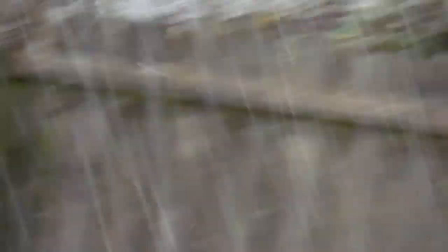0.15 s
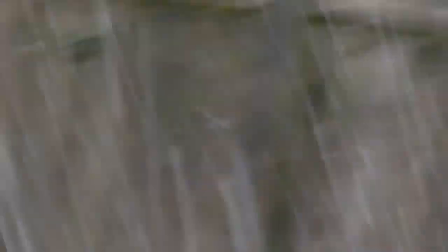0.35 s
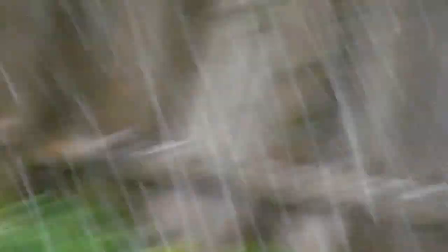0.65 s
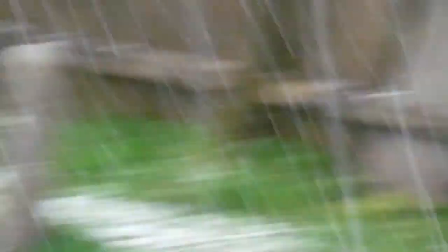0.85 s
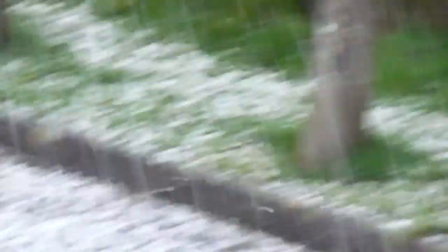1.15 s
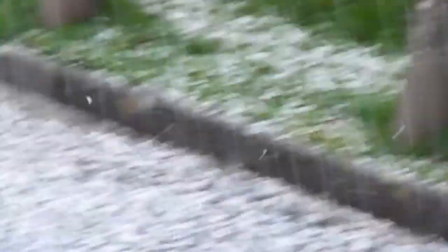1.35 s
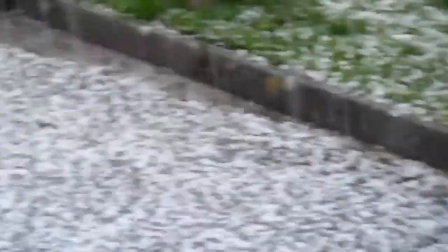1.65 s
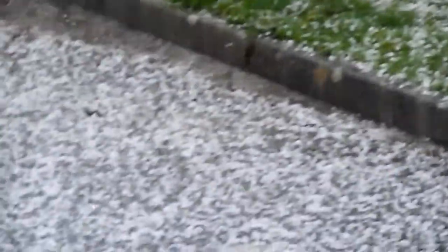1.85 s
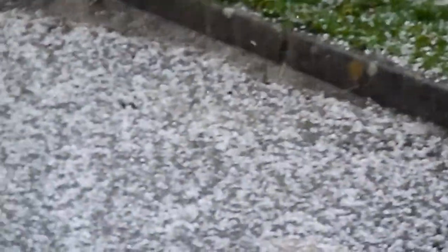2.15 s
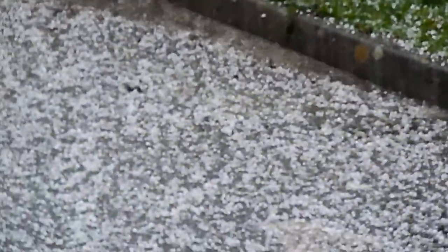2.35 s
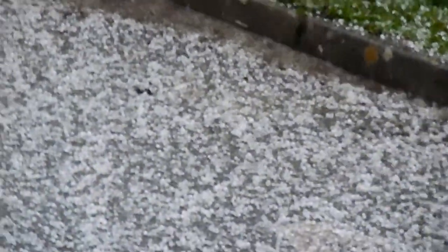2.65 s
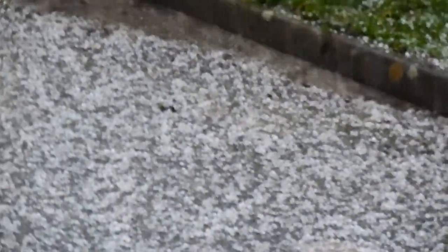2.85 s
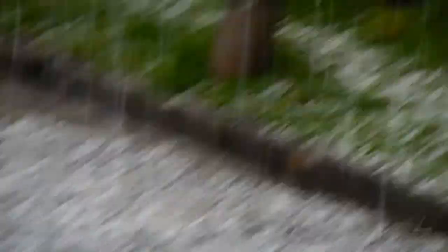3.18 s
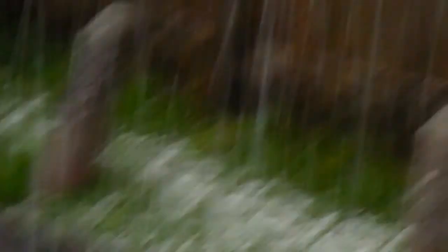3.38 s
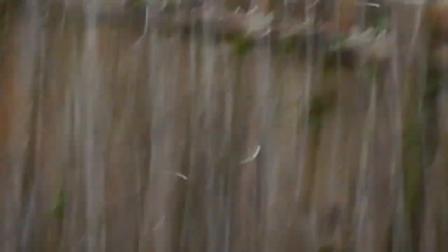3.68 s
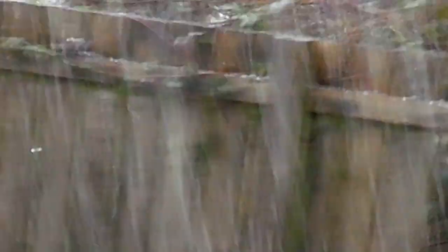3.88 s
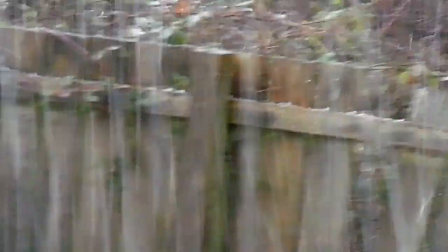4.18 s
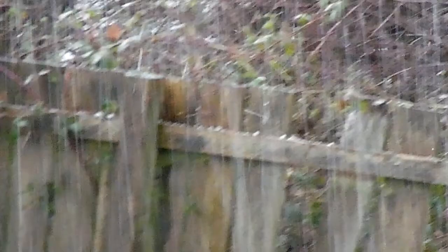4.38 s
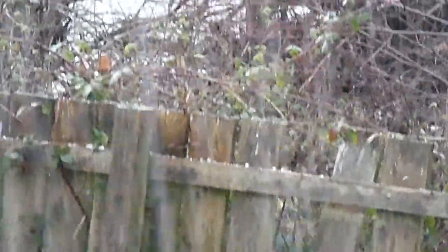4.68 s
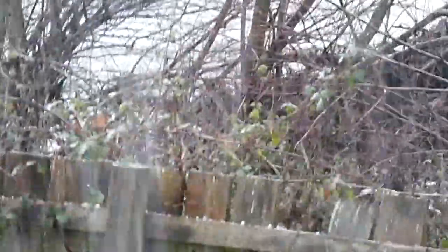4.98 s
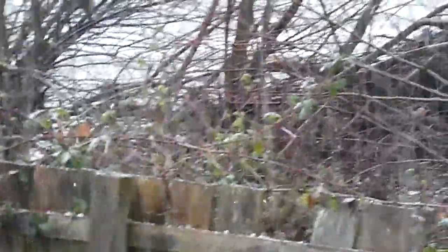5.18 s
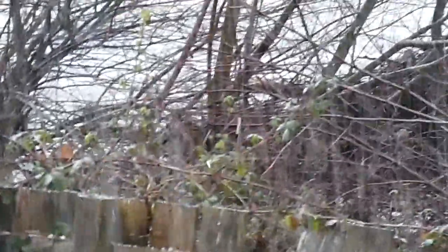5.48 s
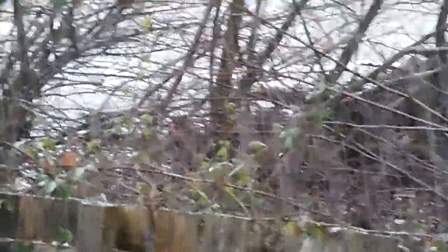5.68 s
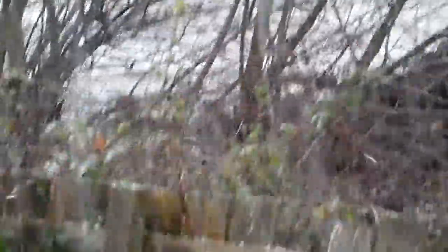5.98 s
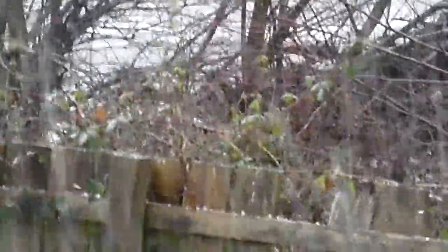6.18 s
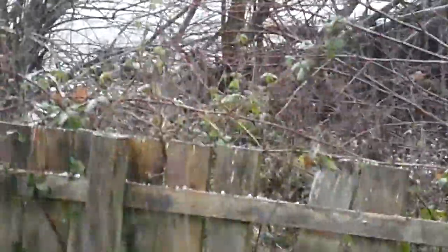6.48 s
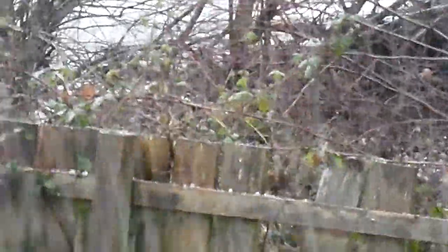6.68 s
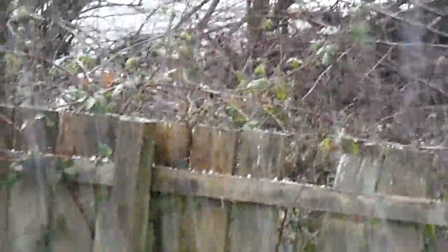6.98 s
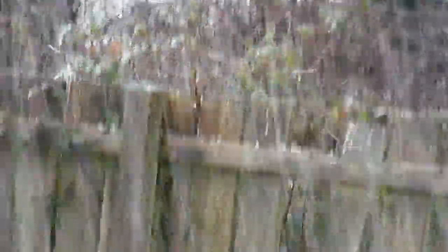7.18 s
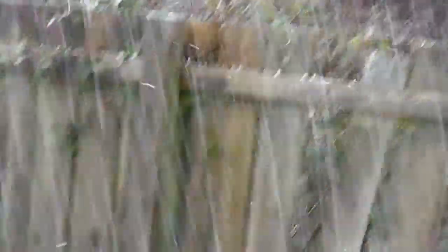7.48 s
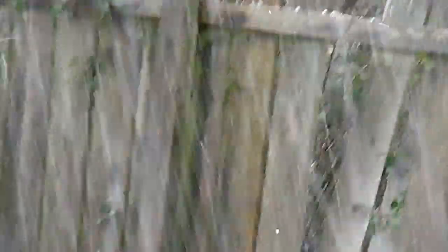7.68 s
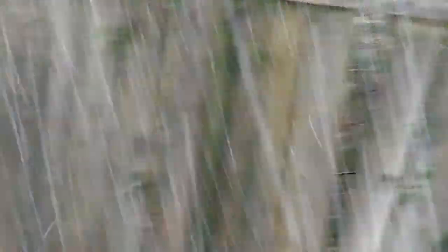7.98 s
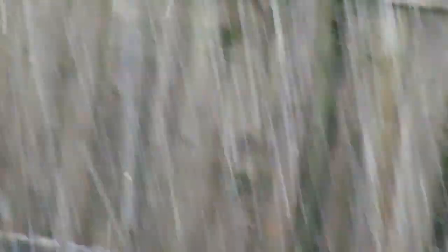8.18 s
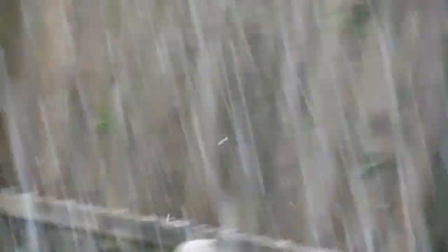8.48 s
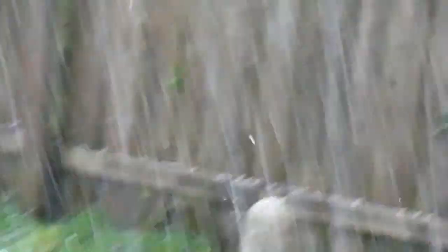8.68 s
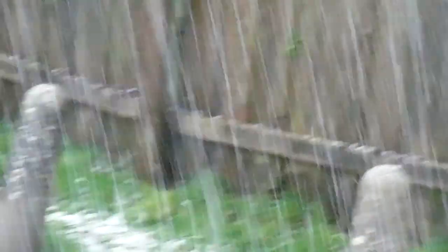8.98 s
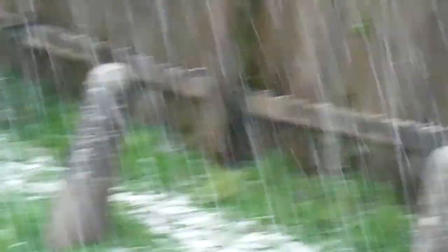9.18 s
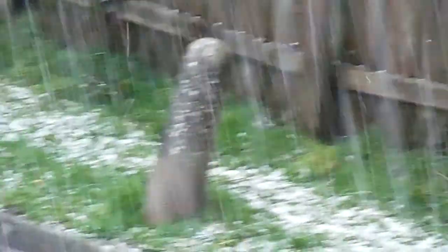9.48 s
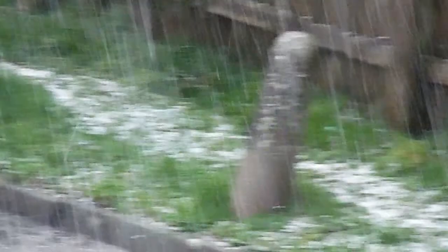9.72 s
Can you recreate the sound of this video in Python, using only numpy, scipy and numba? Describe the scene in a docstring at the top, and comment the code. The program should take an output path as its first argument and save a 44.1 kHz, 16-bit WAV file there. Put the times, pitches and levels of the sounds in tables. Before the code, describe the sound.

Hail falls outdoors for about ten seconds, heard from beside a house wall. A dense, bright hiss of stones on paving runs throughout, with a duller patter on wood and a low rumble underneath. Close stones click and shatter sharply on the ground, in a flurry from 0.4 to 0.7 seconds, where one knocks on a wooden fence. Strong snaps come around 1.3, 2.3, 3.3, 4.1 and 4.4 seconds. Faint metallic pings are scattered between 1.4 and 6.3 seconds, and light taps on twigs come now and then. At about 5.2 seconds a big stone cracks on a very near ledge and bounces. A dull wooden knock and a sharp click land at 7 seconds. From 8.6 to 9.7 seconds several stones knock on the boards among more clicks. The hiss dips briefly after the hardest blows, then creeps back.

```python
"""Beside a house wall, in a hailstorm on paving, grass and a wooden fence.
Over a low rumble, countless far impacts superpose into a hiss, while nearer ones tick and patter.
A few stones strike close by: they crack on stone or excite the damped modes of twigs, metal, boards
and a ledge, and the wall reflects these blows. The fall is nearly steady, but each hard blow makes
the recorder's gain control duck, hold and creep back."""
import sys
import numpy as np
from scipy import signal
from scipy.fft import rfft, irfft
from scipy.io import wavfile
from scipy.ndimage import minimum_filter1d
from numba import njit

SR = 44100
rng = np.random.default_rng(int(sys.argv[2]) if len(sys.argv) > 2 else 0)


def store_wav(level_fs):
    """Save 16-bit WAV to argv[1]."""
    pcm = np.round(np.clip(np.atleast_2d(level_fs), -1, 1) * 32767)
    wavfile.write(sys.argv[1], SR, pcm.T.astype(np.int16))


N = 434385
TIME = np.arange(N) / SR
AGE = TIME[:SR // 3]  # seconds since an impact


def undb(db):
    """Decibels to amplitude ratio."""
    return 10 ** (np.asarray(db) / 20)


def unit(x):
    """Normalisation to rms 1."""
    return x / np.sqrt(np.mean(x ** 2))


def curves(rows):
    """Linear interpolation of each column over time."""
    s, *columns = np.transpose(rows)
    return [np.interp(TIME, s, c) for c in columns]


def colour(x, spectrum):
    """Minimum-phase filtering to a given spectrum, with unit power gain."""
    size = 4096
    hz, db = np.transpose(spectrum)
    gain = undb(np.interp(np.log(np.fft.rfftfreq(size, 1 / SR) + 1), np.log(hz), db))
    cepstrum = irfft(np.log(gain))
    cepstrum[1:size // 2] *= 2
    cepstrum[size // 2 + 1:] = 0
    response = irfft(np.exp(rfft(cepstrum)))
    return signal.fftconvolve(x, response / np.linalg.norm(response))[:len(x)]


def bandpass(x, order, low_hz, high_hz):
    """Butterworth band-pass filtering."""
    return signal.lfilter(*signal.butter(order, [low_hz, high_hz], "bandpass", fs=SR), x)


def ring(hz, t60):
    """Free vibration of a damped mode, falling 60 dB in t60 seconds."""
    return np.sin(2 * np.pi * hz * AGE) * np.exp(-np.log(1000) * AGE / t60)


def burst(t60):
    """White noise in exponential decay."""
    return rng.standard_normal(len(AGE)) * np.exp(-np.log(1000) * AGE / t60)


def add(out, s, sound):
    """Superposition of a sound starting at s seconds."""
    i = int(s * SR)
    out[i:i + len(sound)] += sound[:N - i]


def walk(per_s):
    """Interpolated noise: a slow wandering with a spread near 1."""
    step = int(SR / per_s)
    count = N // step + 2
    return np.interp(TIME, np.arange(count) * step / SR, rng.standard_normal(count))


def impacts(per_s, spread_db):
    """A Poisson process of impacts: many small, a few large."""
    falls = rng.random(N) < per_s / SR
    size = undb(spread_db * np.minimum(rng.standard_exponential(N), 5))
    return unit(falls * size * rng.choice([-1, 1], N))


def scatter(x, t60, tail_db):
    """Scattering: fragments and reflections trail each impact, decaying alike in all bands."""
    power = signal.fftconvolve(x ** 2, np.exp(-2 * np.log(1000) * AGE / t60))[:N]
    tail = unit(np.sqrt(np.abs(power)) * rng.standard_normal(N))
    return unit(x + undb(tail_db) * tail)


# The rumble's spectrum. Each row: frequency in Hz, spectral density in dB.
RUMBLE_SPECTRUM = [(15, -15), (30, 1), (45, 2), (75, -3), (130, -3), (200, -3.5), (300, -7.5), (700, -24)]
# The rumble's strength. Each row: time in seconds, level in dB.
RUMBLE_LEVELS = [(0, -39.5), (1.3, -41), (2, -37), (3.5, -37.5), (4.5, -39), (6, -38.5), (7.5, -40.5),
                 (8.2, -39), (8.75, -38), (9.3, -38.5), (9.85, -37)]


def rumble():
    """Low outdoor noise, with a drone that wavers by random frequency and amplitude modulation."""
    level_db, = curves(RUMBLE_LEVELS)
    drone_hz = 58 + 4 * walk(per_s=14)
    drone = np.sin(2 * np.pi * np.cumsum(drone_hz) / SR) * (1 + .44 * walk(per_s=15))
    noise = colour(rng.standard_normal(N), RUMBLE_SPECTRUM)
    return undb(level_db) * (unit(noise) + undb(-9.5) * unit(drone))


# Hail on paving. Each row: frequency in Hz, spectral density in dB.
HISS_SPECTRUM = [(300, -12.5), (1000, -2.5), (1900, -1.5), (2600, 1), (3600, 0), (5000, 0), (7000, 0.2),
                 (9500, -1.5), (12000, -6), (15800, -12)]


def paving():
    """Shot noise: far stones merge into a wash; nearer ones tick, each size in its own band."""
    wash = impacts(per_s=9000, spread_db=2)
    near = scatter(impacts(per_s=80, spread_db=2.6), t60=.08, tail_db=7)
    chips = 0
    for hz in np.geomspace(2000, 13000, num=7):
        stones = scatter(impacts(per_s=70, spread_db=2.8), t60=.05, tail_db=5)
        chips += bandpass(stones, 1, hz / 2 ** .25, hz * 2 ** .25)
    hail = wash + undb(-6) * near + undb(-5) * unit(chips)
    return unit(colour(hail, HISS_SPECTRUM))


# Hail on wood and roofs. Each row: frequency in Hz, spectral density in dB.
PATTER_SPECTRUM = [(110, -20.5), (210, -2.5), (275, -6.5), (375, -3), (435, -5), (585, 0), (750, -3.5),
                   (900, -1), (1040, 0.5), (1380, -3), (1800, -7), (2600, -10.5), (5000, -30)]


def fence():
    """Filtered shot noise: stones drum on wood and roofs further off in a dull, dense patter."""
    blows = scatter(impacts(per_s=1500, spread_db=2), t60=.06, tail_db=2)
    flicker_db = .4 * walk(per_s=12)
    return unit(colour(blows * undb(flicker_db), PATTER_SPECTRUM))


# The modes of a piece of metal. Each row: frequency in Hz, level in dB, t60 in seconds.
METAL_MODES = [(3850, -11, .12), (4398, -4, .18), (4544, 0, .21), (4696, 0, .23), (4830, -9, .14),
               (5233, -7, .19), (6040, -7, .19)]


def tinkle():
    """Convolution of small impacts with the metal's impulse response keeps it ringing."""
    response = sum(undb(db) * ring(hz, t60) for hz, db, t60 in METAL_MODES)
    return unit(signal.fftconvolve(impacts(per_s=25, spread_db=2), response)[:N])


# The fall's strength. Each row: time in seconds, hiss level in dB, patter in dB relative to the hiss.
FALL_LEVELS = [(0, -27.4, -3.5), (.6, -26.5, -4.5), (1.45, -26.5, -3.5), (1.8, -24.5, -4),
               (2.2, -25.5, -4.5), (2.7, -25, -4), (3.2, -25.5, -5), (3.6, -27, -3.5), (4.2, -26.5, -3),
               (4.8, -24.5, -3.5), (6.1, -26, -4), (6.68, -23, -4.5), (6.95, -26, -1.5), (7.5, -26.5, -5.5),
               (8.15, -24, -4), (8.9, -25, -4), (9.4, -23.5, -5.5), (9.85, -25, -4)]


def hailfall():
    """Incoherent summation: hiss, patter and faint tinkle swell together with the fall."""
    hiss_db, patter_db = curves(FALL_LEVELS)
    return undb(hiss_db) * (paving() + undb(patter_db) * fence() + undb(-22.5) * tinkle())


# Light stones on twigs and leaves. Each row: start in seconds, level in dB, pitch in Hz.
TWIG_TAPS = [(1.048, -18, 2440), (1.226, -14, 2340), (3.273, -21, 2420), (6.169, -22, 1110),
             (7.715, -15.5, 2430), (8.239, -16, 1350), (8.572, -15, 1730), (8.955, -17, 2430)]


def taps():
    """Heavy damping: a struck twig or leaf rings for only an instant."""
    out = np.zeros(N)
    for s, db, hz in TWIG_TAPS:
        add(out, s, undb(db) * (ring(hz, t60=.019) + undb(-12) * burst(t60=.0057)))
    return out


# Breaking ice. Each row: frequency in Hz, spectral density in dB.
CRACK_SPECTRUM = [(200, -17), (1000, -13), (2500, -3), (4500, 2.5), (8000, 1), (11000, -2), (16000, -17)]


def crack(t60):
    """Brittle fracture: a breaking hailstone gives a bright burst of noise."""
    return colour(burst(t60), CRACK_SPECTRUM)


def modal_ring(modes, detune):
    """Modal superposition, with alternating signs and slightly different tuning at each blow."""
    stretch = 1 + detune * rng.standard_normal(len(modes))
    return sum((-1) ** k * undb(db) * ring(hz * stretch[k], t60)
               for k, (hz, db, t60) in enumerate(modes))


def strikes(events, modes, detune, crack_db, crack_t60):
    """Impulsive excitation: each blow rings an object's modes as the stone cracks."""
    out = np.zeros(N)
    for s, db in events:
        add(out, s, undb(db) * (modal_ring(modes, detune) + undb(crack_db) * crack(crack_t60)))
    return out


# Stones on the metal. Each row: start in seconds, level in dB.
METAL_PINGS = [(1.405, -33), (2.652, -27), (2.737, -27), (3.276, -28.5), (3.873, -30), (4.509, -25),
               (4.995, -31), (5.055, -32), (5.28, -30), (5.44, -31), (5.69, -31), (6.331, -31)]


def pings():
    """Light damping: the metal's high modes ring on past the crack."""
    return strikes(METAL_PINGS, METAL_MODES, detune=.001, crack_db=-2, crack_t60=.1)


# Close stones on hard ground; the row at 0.677 s is the wall's echo of the tick just before it. Each row: start
# in seconds, snap in dB, shatter in dB, pitch in Hz.
GROUND_TICKS = [(.413, -9, -11.5, 5100), (.511, -3, -18, 6600), (.638, -8, -11.5, 3000),
                (0.67, -9, -13, 7950), (.677, -4, -20, 8000), (.737, -4, -9.5, 4460),
                (1.313, -1, -16, 6900), (1.406, -11, -9.5, 4370), (1.674, -19, -12, 5000),
                (1.902, -4, -12.5, 8500), (2.2305, 4.5, -19, 6540), (2.2715, 5.5, -18, 9000),
                (2.315, 0, -19, 9000), (3.229, -7, -11, 5000), (3.276, 1.5, -10, 4740),
                (3.873, -11, -13, 5000), (4.119, -0.5, -17, 6040), (4.446, 2.5, -19, 5800),
                (4.797, -10, -13, 9000), (4.996, -9, -10, 5740), (6.331, -11, -11.5, 5200),
                (6.705, -2, -14, 9100), (7.037, 1, -6, 7700), (7.532, -7, -10, 7500),
                (8.114, -13, -13, 6000), (8.401, -13, -12, 6000), (8.968, 3, -22, 4050),
                (9.497, -7, -8, 4700), (9.725, -10, -7.5, 8100)]


def ticks():
    """Brief, stiff contact: ice on stone snaps for about a cycle, then shatters around that pitch."""
    out = np.zeros(N)
    rise_s = .001
    for s, snap_db, shatter_db, hz in GROUND_TICKS:
        snap = ring(hz, t60=5 / hz)
        fragments = (burst(t60=.042) + undb(-6.5) * burst(t60=.16)) * (1 - np.exp(-AGE / rise_s))
        spray = bandpass(fragments, 1, hz / 1.7, min(hz * 1.52, .45 * SR))
        add(out, s, undb(snap_db) * snap + undb(shatter_db) * spray)
    return signal.sosfilt(signal.butter(2, 1500, "highpass", fs=SR, output="sos"), out)


# A board's modes. Each row: frequency in Hz, level in dB, t60 in seconds.
BOARD_MODES = [(245, -14, 0.13), (374, -8.5, 0.083), (545, -22, .054), (670, -23, .06), (756, -10, 0.074),
               (871, -11, 0.099), (1110, -30, .05), (1224, -4.5, 0.036), (1457, -13, 0.057),
               (1614, -6.5, .073), (2035, -13, 0.056), (2850, -11, 0.076), (3130, -13, 0.055),
               (3420, -8.5, 0.036), (4290, -6.5, .035), (4580, -5.5, 0.068)]
# Stones on boards. Each row: start in seconds, level in dB, pitch of the struck spot in Hz,
# contact cut-off in Hz, board level in dB relative to the spot.
BOARD_KNOCKS = [(0.6896, -3, 1330, 2980, -8.5), (7.0624, -6.5, 400, 1000, -8), (7.378, -18, 355, 600, -1),
                (8.625, -9.5, 1757, 3500, -6), (8.9668, -6.5, 1370, 4350, -3.5),
                (9.12, -6.5, 1560, 3370, -1), (9.127, -6.5, 336, 2960, -2), (9.365, -14.5, 1820, 3070, -5),
                (9.74, -12.5, 1180, 3000, -2)]


def knocks():
    """Contact as a low-pass filter: the struck spot rings over board modes, duller for a soft blow."""
    out = np.zeros(N)
    for s, db, spot_hz, contact_hz, board_db in BOARD_KNOCKS:
        excited = [(hz, mode_db - 10 * np.log10(1 + (hz / contact_hz) ** 4), t60)
                   for hz, mode_db, t60 in BOARD_MODES]
        board = modal_ring(excited, detune=.014)
        rattle = bandpass(burst(t60=.18), 2, 300, max(contact_hz, 500))
        splinter_db = -18.5 + 5 * np.log2(contact_hz / 3000)  # harder contacts splinter more
        splinters = undb(splinter_db) * crack(t60=.091)
        spot = ring(spot_hz, t60=.027)
        add(out, s, undb(db) * (spot + undb(board_db) * (board + rattle) + splinters))
    # a narrow board radiates little bass
    return signal.sosfilt(signal.butter(4, 190, "highpass", fs=SR, output="sos"), out)


# A hard ledge's modes. Each row: frequency in Hz, level in dB, t60 in seconds.
LEDGE_MODES = [(238, -19, 0.1), (379, -5, .081), (452, -3, 0.089), (564, -4, 0.075), (715, .5, 0.03),
               (1380, -7, .024), (1770, -5, 0.02), (2180, -2, 0.05), (3260, -10, 0.046), (3536, -5, 0.04),
               (4320, -19, 0.15), (4800, -20, .07), (6030, -10, .077), (6490, -18, .056), (7190, -30, .041),
               (11740, -7.5, .03)]
# One big stone and its bounce. Each row: start in seconds, level in dB.
LEDGE_BLOWS = [(5.1607, -5.5), (5.183, -15)]


def slam():
    """Broadband excitation: a big stone rings a very near ledge from bass to treble and rebounds."""
    return strikes(LEDGE_BLOWS, LEDGE_MODES, detune=.0032, crack_db=-2, crack_t60=.11)


def wall(x, lag_s=.0058, reflection_db=-7):
    """Comb filtering: the house wall's reflection interferes with the direct sound."""
    return x + undb(reflection_db) * np.pad(x, (int(lag_s * SR), 0))[:N]


def scene():
    """Superposition of hailfall, rumble and close blows, the same in both ears."""
    storm = hailfall()
    close = ticks() + knocks() + taps() + slam() + pings()
    mono = storm + rumble() + wall(close)
    return np.array([mono, mono])


@njit
def follow(x, rise, fall):
    """First-order lag with separate time constants up and down, in samples."""
    y, now = np.empty(len(x)), 0.
    for i in range(len(x)):
        now += (x[i] - now) / (rise if x[i] > now else fall)
        y[i] = now
    return y


def gain_control(x, threshold_db=-6, attack_s=.026, hold_s=.39, release_s=.31):
    """Limiting: a peak over the threshold pulls the gain down by its excess; it holds, then recovers."""
    excess_db = 20 * np.log10(np.maximum(np.abs(x).max(axis=0) / undb(threshold_db), 1))
    size = int(hold_s * SR)
    held_db = -minimum_filter1d(-excess_db, size, mode="constant", origin=(size - 1) // 2)
    return x * undb(-follow(held_db, attack_s * SR, release_s * SR))


def record(dry):
    """Overload: hard blows outrun the gain control and clip; a steep low-pass cuts the top."""
    clipped = np.clip(gain_control(dry), -1, 1)
    return signal.sosfilt(signal.ellip(10, .2, 90, 15900, fs=SR, output="sos"), clipped)


dry = scene()
out = record(dry)
store_wav(out)
```